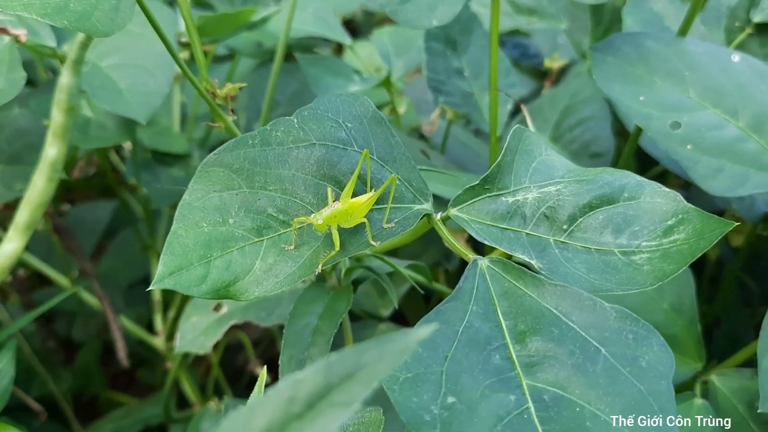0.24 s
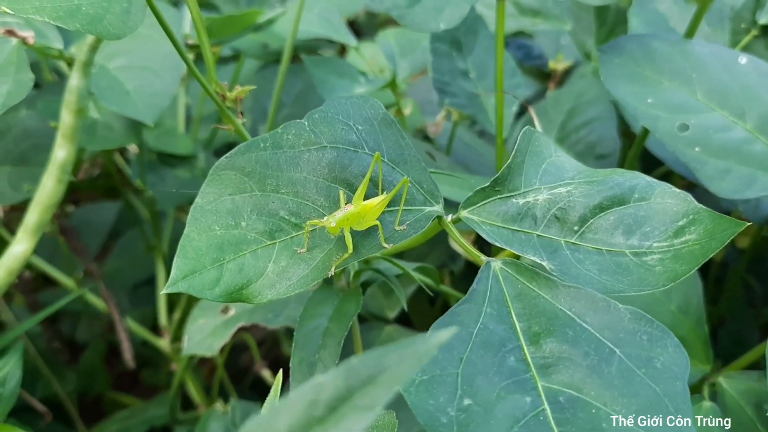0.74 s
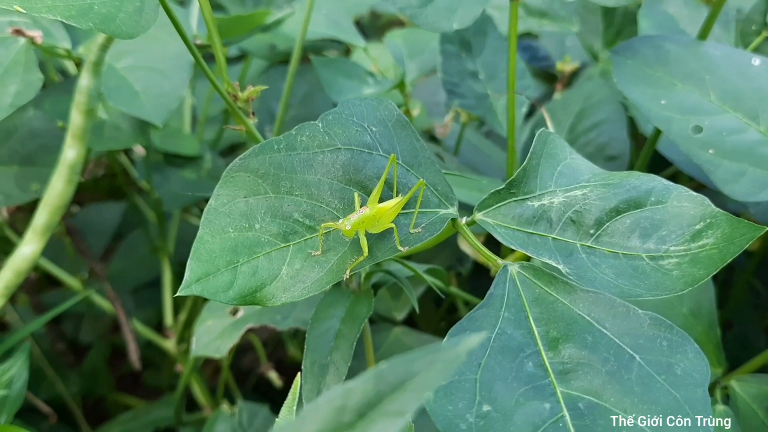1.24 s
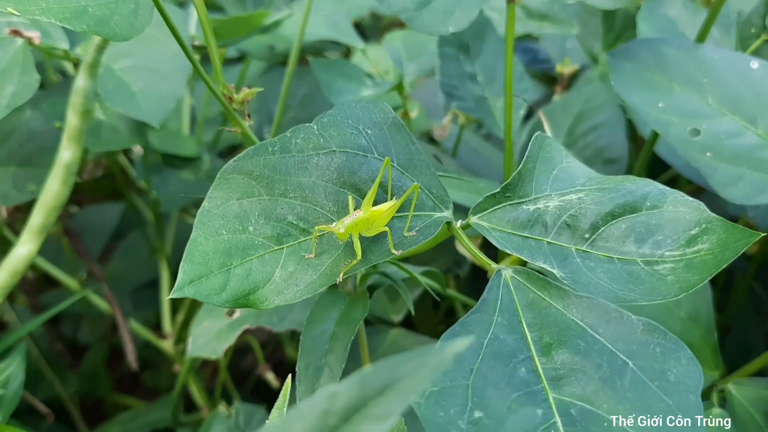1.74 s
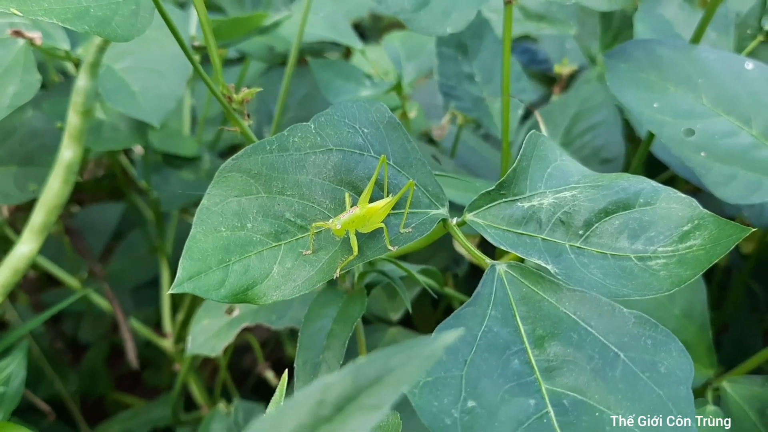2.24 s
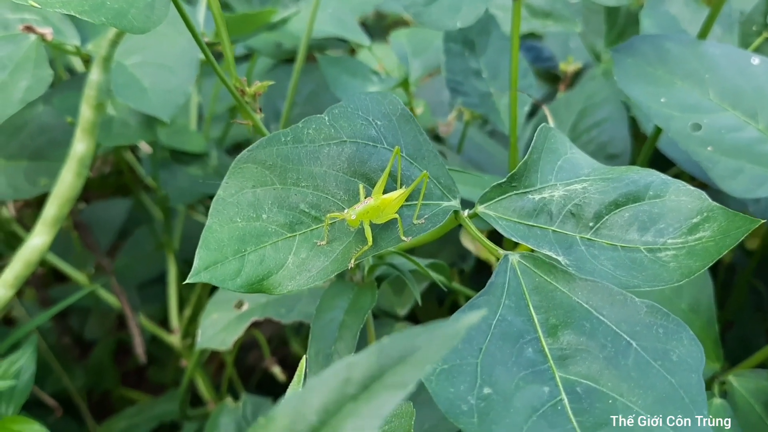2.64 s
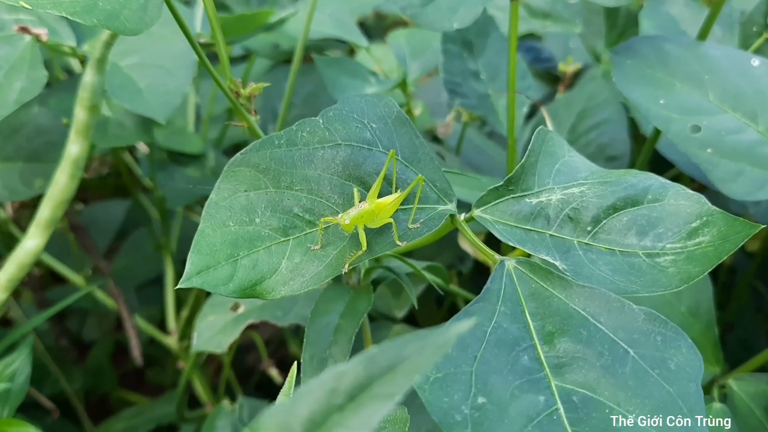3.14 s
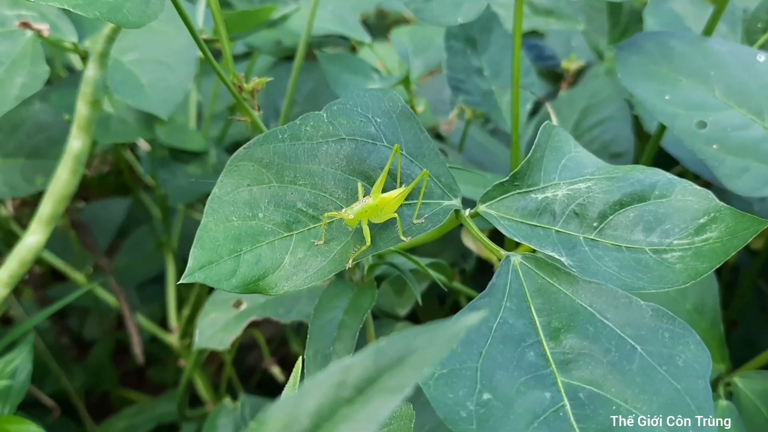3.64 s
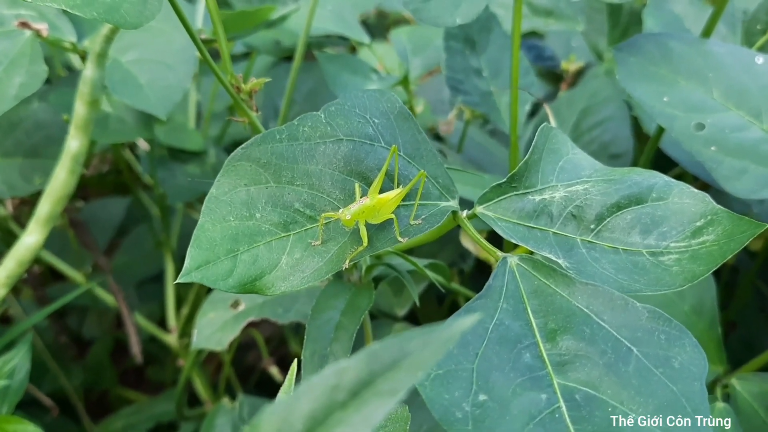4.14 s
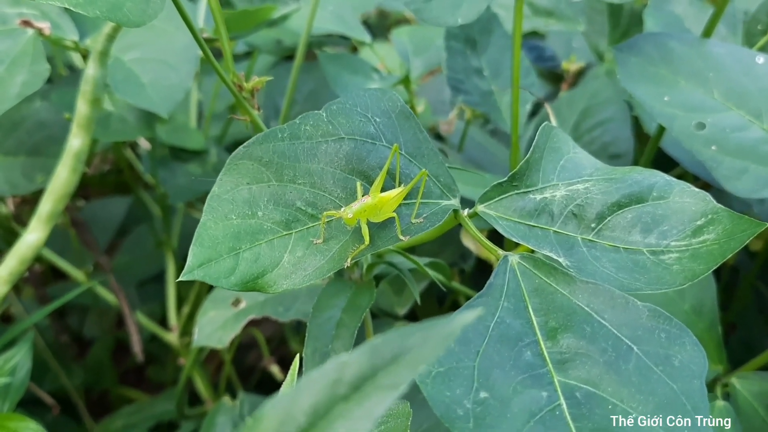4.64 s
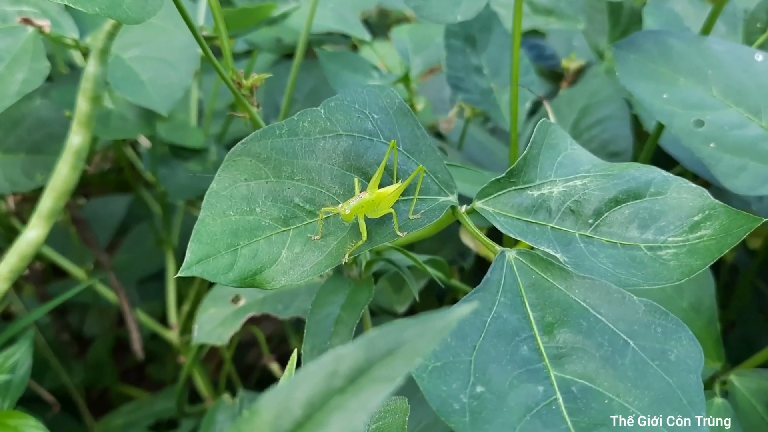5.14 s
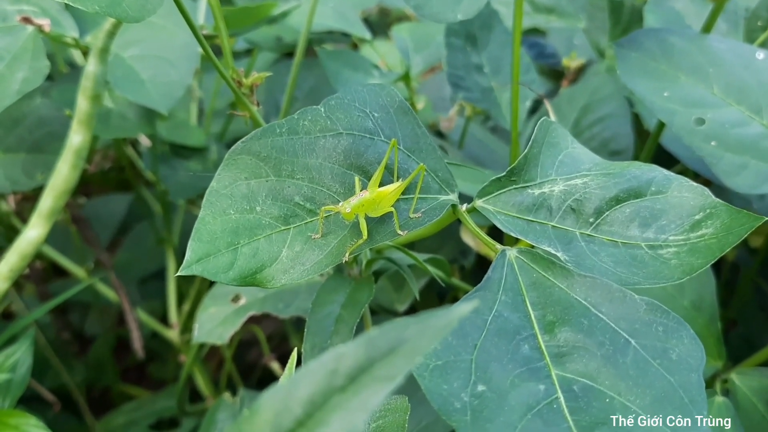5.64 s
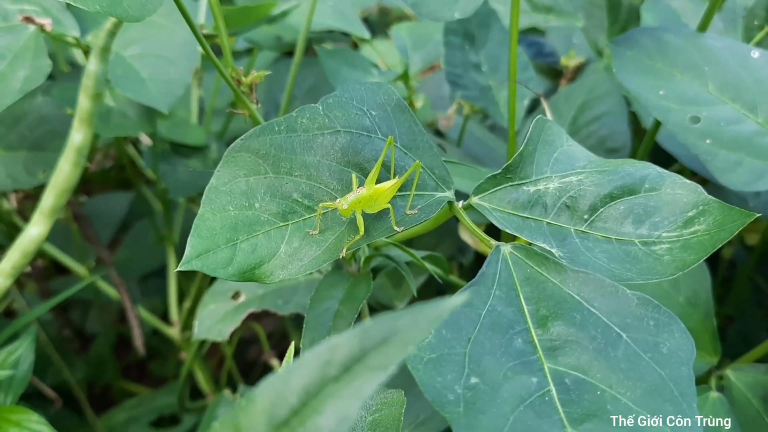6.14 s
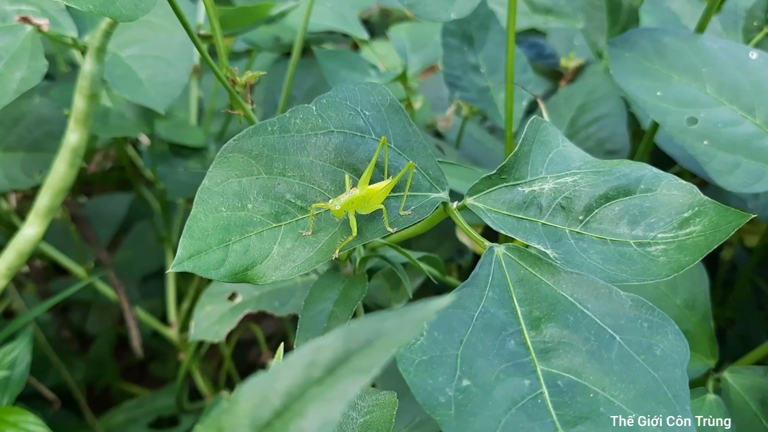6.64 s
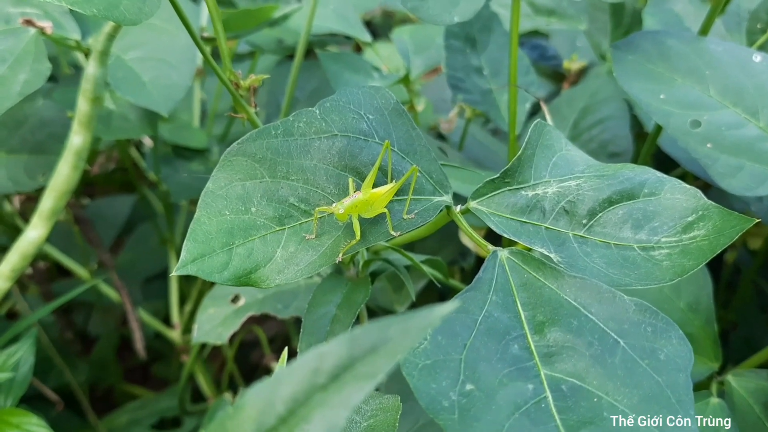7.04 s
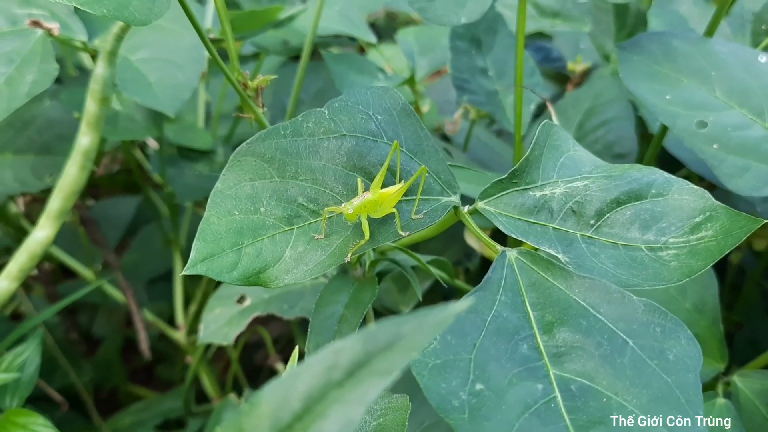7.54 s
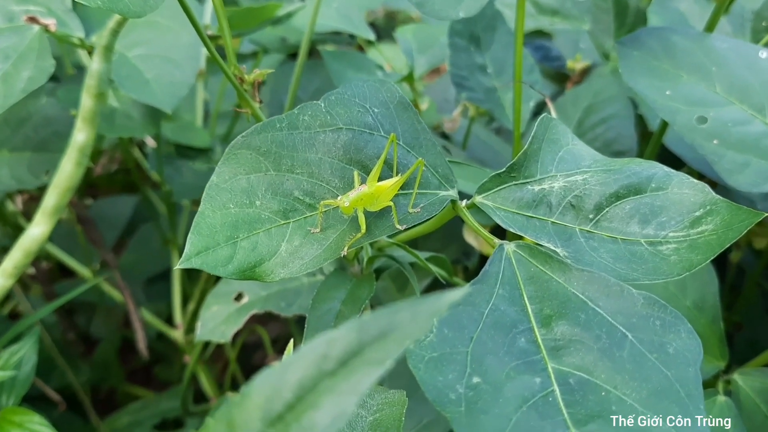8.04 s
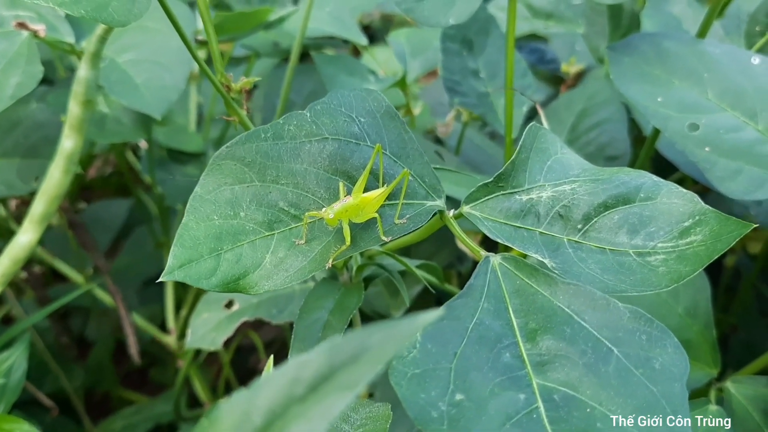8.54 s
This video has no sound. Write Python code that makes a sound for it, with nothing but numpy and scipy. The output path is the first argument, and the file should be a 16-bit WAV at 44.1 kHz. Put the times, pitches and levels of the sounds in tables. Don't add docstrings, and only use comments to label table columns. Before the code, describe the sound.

A continuous daytime insect chorus in a leafy garden, in wide stereo with a soft bed of rumble and hiss. From the start, three close crickets trill around 7.6 to 8.2 kHz, pulsing roughly 26 to 28 times a second. The loudest, on the right, pauses at 0.7-1.1 and 5.0-5.4 seconds and stops near 7.0; another also breaks off and ends about 7.2, while the softest continues throughout. Distant crickets blur behind. Raspy single chirps scatter from 0.1 to 7.0. On the left, katydids sizzle above 9 kHz, stronger after 5.7. Slight leaf rustles and dry snaps come near 0.9, 2.2, 4.7, 5.9, 7.5 and 8.2. A low distant motor hum, faint initially, grows around 1.5, swells at 4-6.4, then eases unsteadily. A very faint falling bird whistle passes at 7.7-8.0.

```python
import sys
import numpy as np
from scipy import signal
from scipy.fft import rfft, irfft, next_fast_len
from scipy.io import wavfile
from scipy.ndimage import uniform_filter1d

SR = 44100
rng = np.random.default_rng(int(sys.argv[2]) if len(sys.argv) > 2 else 0)


def volts_from_decibels(level):
    exponent = np.asarray(level, float) / 20
    return 10 ** exponent


def unload_wav(signal):
    wavfile.write(
        sys.argv[1],
        SR,
        np.round(np.clip(np.atleast_2d(signal).T, -1, 1) * 32767).astype(np.int16),
    )


N = 387462

# first stroke in seconds, last stroke in seconds,
# intervals between strokes (count), warm-up from below in Hz.
TRILL_PHRASES = [
    [(.030, .713, 18, 0), (1.091, 5.029, 104, 250), (5.450, 7.041, 42, 60)],
    [(.028, .756, 21, 0), (1.175, 4.462, 95, 420), (4.817, 5.577, 22, 420), (5.645, 5.680, 1, 0),
     (5.750, 7.197, 42, 0)],
    [(.022, 8.777, 241, 0)],
]
PHRASE_LEVELS = [
    [(-40, -41), (-41.5, -41.5, -39.5, -40.5), (-39.5, -39.5)],
    [(-46, -46.5), (-47, -45.5), (-45.5, -45.5), (-46, -46.5), (-44.5, -44.5)],
    [(-50.5, -52.5, -55, -52.5, -50.5, -50, -53, -53)],
]
STROKE_PITCHES = [7718, 8150, 7585]
# pitch fall in a stroke in Hz, stroke length in ms, # left-ear
# delay in ms (a late echo for the first), scatter by leaves in dB, left-right difference in dB.
WING_TRAITS = [(71, 14.5, 7.0, -12, -19), (80, 16, 0.65, -18, -4), (75.6, 17, -1.5, -9, -3.5)]
WAVER_SPREADS = [0.5, .6, 1.1]
# frequency in Hz, density in dB per Hz.
CHORUS_SPECTRUM = [(6700, -36), (6900, -20.5), (7100, -7.5), (7330, -1), (7600, -0.5), (7900, 0),
                   (8150, -6.5), (8300, -9), (8600, -17.5), (9000, -31)]
# pitch in Hz, strokes per second, level in dB, left-right in dB.
CHORUS_SOLOISTS = [(7403, 26.9, -12.5, -14.5), (7770, 27.8, -11.5, -16), (7895, 28.1, -11, -9)]
# time in seconds, level in dB.
CHORUS_LEVEL = [
    (0, -50),
    (1, -52),
    (2.6, -51),
    (4.4, -50.5),
    (6, -50),
    (8, -52),
    (8.79, -55),
]
# time in seconds, peak in dB, left-right difference in dB.
CHIRP_EVENTS = [(0.1401, -47, -7.0), (0.5566, -50, 2.5), (0.6235, -50, 3.5), (0.8594, -58, -4.0),
                (1.4945, -54, -11.0), (1.9784, -49, -7.5), (3.1208, -54, -6), (3.2455, -52, -7.0),
                (3.3538, -45, -11.5), (3.6676, -50, -6.5), (4.1875, -48, -11), (4.4494, -45, -9.5),
                (4.5466, -50, 4.5), (4.9756, -51, -11.0), (5.0727, -53, -10.5), (5.1635, -47, -8),
                (5.2954, -50, 6.0), (5.5344, -48, -6), (5.8386, -47, -12.5), (6.0465, -51, -7.5),
                (6.1644, -57, -6.0), (6.2572, -52, -7.5), (6.4602, -52, -12.5), (6.5864, -52, -7.5),
                (6.765, -51, -11), (7.005, -49, -11)]
# time in seconds,
# sub-strokes so far (count).
SUBSTROKE_COUNTS = [
    [(0, -.06), (1.25, 106.25), (4, 339.71), (5, 424.59), (8.79, 745.5)],
    [(0, -12.2), (6.5, 554.86), (7, 599.13), (8.79, 754.7)],
]
# time in seconds, level of both in dB, share of the second (0 to 1).
KATYDID_LEVELS = [(0, -50.5, 0.3), (1.5, -51.5, 0.07), (3, -51, 0.1), (5.4, -50.5, 0.01), (5.7, -48, .4),
                  (6.4, -48, 0.64), (7, -47, 0.9), (8.79, -46.5, 0.85)]
# frequency in Hz, density in dB per Hz.
KATYDID_SPECTRUM = [(9000, -13.5), (9800, -20), (10800, -11), (12000, -6), (13100, -3), (14000, -3),
                    (15100, -1), (15750, -5.5), (15900, -53)]
# time in seconds, peak in dB, length in seconds, low edge in Hz, high edge in Hz.
RUSTLE_EVENTS = [(0.198, -64.5, .14, 2000, 5030), (0.551, -62, 0.063, 2000, 6000),
                 (0.849, -63, 0.32, 400, 1400), (0.868, -54, 0.037, 600, 6000),
                 (0.912, -56, .11, 700, 6560), (1.389, -70.5, 0.25, 574, 660),
                 (1.932, -63, 0.065, 2200, 6000), (2.207, -52, .035, 4000, 13000),
                 (4.687, -58, 0.031, 2004, 12000), (5.582, -65, 0.046, 2500, 6000),
                 (5.88, -56, .02, 3000, 13000), (5.958, -57.5, 0.08, 2500, 6500),
                 (6.098, -69, .15, 3230, 4180), (6.903, -65, 0.054, 2000, 6000),
                 (7.5, -62, 0.014, 4504, 6995), (8.212, -53, 0.04, 3504, 13000),
                 (8.27, -63, 0.04, 2510, 4000)]
# time in seconds, peak in dB.
SNAP_EVENTS = [
    (.855, -50),
    (.876, -53),
    (2.196, -43),
    (4.68, -49),
    (5.879, -43),
    (7.503, -49),
    (8.199, -43),
]
# start in seconds, length in seconds, from Hz, to Hz, level in dB.
BIRD_WHISTLE = (7.68, .3, 4100, 3200, -69)
# time in seconds, level in dB.
MOTOR_LOAD = [(0, -69.5), (.5, -72.5), (1.33, -70), (1.45, -63), (2.1, -60.5), (3.05, -63), (4, -57),
              (4.2, -53), (4.85, -51.5), (5, -55), (5.5, -52), (6.4, -51.5), (7.05, -58), (7.5, -54.5),
              (7.7, -57.5), (7.9, -56.5), (8.79, -57)]
# centre in Hz, width in Hz, level in dB.
FAR_DRONES = [(298.2, 18, -70.5), (396, 7, -98.5), (4680, 460, -68)]
# frequency in Hz, density in dB per Hz.
AIR_SPECTRUM = [(12, -28), (40, -9.5), (65, -3), (160, 0.5), (290, -2.5), (430, -14.5), (700, -19.5),
                (1100, -24.5), (1600, -25.5), (3500, -23), (5200, -19.5), (6500, -16.5), (8600, -16),
                (9500, -26), (16000, -36)]
# frequency in Hz, left-right difference in dB.
AIR_BALANCE = [(60, 3.0), (180, -0.5), (550, 6), (1650, 4.5), (4970, -9.5), (15000, 9)]
# frequency in Hz, likeness (0 to 1).
EAR_LIKENESS = [(60, .6), (200, .65), (350, .55), (640, .2), (1400, .3), (4000, .4), (9000, .3),
                (15000, .25)]


def rms_one(x):
    return x / np.sqrt(np.mean(x ** 2) + 1e-20)


def in_time(rows):
    s, *columns = np.transpose(rows)
    return [np.interp(np.arange(N) / SR, s, c) for c in columns]


def at_hz(points, hz):
    table_hz, values = np.transpose(points)
    return np.interp(np.log(hz), np.log(table_hz), values)


def panned(x, pan_db):
    return np.array([x * volts_from_decibels(pan_db / 2), x * volts_from_decibels(-pan_db / 2)])


def drift(rate):
    r = np.exp(-80 * np.pi * rate / SR)
    slow = signal.lfilter([1], [1, -2 * r, r * r], rng.standard_normal(N // 40 + 2002))[2000:]
    return np.interp(np.arange(N) / 40, np.arange(len(slow)), rms_one(slow))


def coloured(source, spectrum, pan=((10, 0), (20000, 0))):
    port_lag_s = 0.0003973
    size = next_fast_len(N)
    hz = np.maximum(np.arange(size // 2 + 1) * SR / size, 1)
    inside = (hz > spectrum[0][0]) & (hz < spectrum[-1][0])
    ear_signs = np.array([[1], [-1]])
    gain = inside * volts_from_decibels(at_hz(spectrum, hz) + at_hz(pan, hz) / 2 * ear_signs)
    alike = np.clip(at_hz(EAR_LIKENESS, hz), 0, 1)
    mid, side = rfft(source, size) * np.sqrt([1 + alike, 1 - alike])
    left = (mid + side) * np.exp(-2j * np.pi * hz * port_lag_s)
    return rms_one(irfft(gain * np.array([left, mid - side]), size)[:, :N])


def leaf_scatter(x, t60=0.094):
    t = np.arange(int(.2 * SR)) / SR
    echoes = rng.standard_normal((2, len(t))) * volts_from_decibels(-60 * t / t60) * (t > .002)
    echoes = echoes / np.sqrt(np.sum(echoes ** 2, axis=1, keepdims=True))
    return signal.fftconvolve(x[None], echoes, axes=1)[:, :N]


def patchy(x, edges_hz, patch_db, rate):
    total = 0
    for k, edges in enumerate(zip(edges_hz, edges_hz[1:])):
        band = signal.butter(2, edges, "band", fs=SR, output="sos")
        sign = (-1) ** k
        total = total + sign * signal.sosfilt(band, x) * volts_from_decibels(patch_db * drift(rate))
    return rms_one(total)


def trill(times, hz, fall_hz, stroke_ms, gains=1, pitch_spread_hz=8, level_spread_db=1.0, rasp=0.051):
    a, b, c, d = rng.standard_normal((len(times), 4)).T[:, :, None]
    length = stroke_ms / 1000 * (1 + .06 * c)
    steps = np.arange(int(.04 * SR))
    u = np.minimum(steps / SR / length, 1)
    swell = np.abs(np.sin(np.pi * u ** 1.05)) ** 0.7
    pitch = np.reshape(hz, (-1, 1)) + pitch_spread_hz * a + fall_hz * (1 - u) ** 2
    uneven_teeth = uniform_filter1d(rng.standard_normal(u.shape), size=30, axis=1) * np.sqrt(30)
    phase = 2 * np.pi * np.cumsum(pitch, axis=1) / SR + rasp * uneven_teeth + 9 * d
    strokes = 3.06 * volts_from_decibels(level_spread_db * b) * swell * np.sin(phase)
    start_s = np.array(times)[:, None] - .6 * length + .0005 * d
    starts = np.maximum(start_s * SR, 0).astype(int)
    weights = strokes * np.reshape(gains, (-1, 1))
    return np.bincount((starts + steps).ravel(), weights.ravel(), N + SR)[:N]


def near_crickets():
    out = 0
    singers = zip(TRILL_PHRASES, PHRASE_LEVELS, STROKE_PITCHES, WING_TRAITS, WAVER_SPREADS)
    for phrases, levels, hz, (fall_hz, ms, lag_ms, wet_db, pan_db), waver_db in singers:
        times, cold_hz, effort_db = [], [], []
        for (first, last, count, low_hz), ends in zip(phrases, levels):
            n = int(count) + 1
            times.append(np.linspace(first, last, n))
            cold_hz.append(low_hz * np.exp(-np.arange(n) / 1.8))
            effort_db.append(np.interp(np.linspace(0, len(ends) - 1, n), np.arange(len(ends)), ends))
        times, cold_hz, effort_db = [np.concatenate(v) for v in (times, cold_hz, effort_db)]
        song = trill(times, hz - cold_hz, fall_hz, ms, volts_from_decibels(effort_db - 0.028 * cold_hz))
        song = song * volts_from_decibels(waver_db * drift(1.6))
        left = np.roll(song, round(lag_ms * SR / 1000)) * volts_from_decibels(pan_db)
        out = out + np.array([left, song]) + volts_from_decibels(wet_db) * leaf_scatter(song)
    return out


def far_chorus():
    level_db, = in_time(CHORUS_LEVEL)
    chorus = coloured(rng.standard_normal((2, N)), CHORUS_SPECTRUM)
    for hz, per_s, song_db, pan_db in CHORUS_SOLOISTS:
        times = np.arange(rng.random() / per_s, N / SR, 1 / per_s)
        song = trill(times, hz, 50, 16) * volts_from_decibels(song_db + 3.0 * drift(0.3))
        chorus = chorus + panned(song, pan_db) + 0.2 * leaf_scatter(song)
    return volts_from_decibels(level_db) * chorus


def chirps():
    s, peak_db, pan_db = np.transpose(CHIRP_EVENTS)
    ears = []
    for side in (1, -1):
        gains = volts_from_decibels(peak_db - 7.5 + side * pan_db / 2)
        ears.append(trill(s + 0.016, 6950, 273, 28, gains, pitch_spread_hz=42, rasp=0.96))
    return signal.sosfilt(signal.butter(2, [6800, 7400], "band", fs=SR, output="sos"), ears)


def katydids(depth=0.22, weak_db=-8, pan_db=9):
    level_db, share = in_time(KATYDID_LEVELS)
    power = 0.2
    for strokes, part in zip(SUBSTROKE_COUNTS, (1 - share, share)):
        count, = in_time(strokes)
        weak = np.round(count) % 4 == 3
        accent = volts_from_decibels(uniform_filter1d(weak_db * weak, size=150))
        power = power + part * ((1 + depth * np.cos(2 * np.pi * count)) * accent) ** 2
    teeth = rng.standard_normal((2, N)) * volts_from_decibels(1.4 * rng.standard_normal((2, N))) * volts_from_decibels(1.07 * drift(300))
    buzz = coloured(teeth * np.sqrt(power), KATYDID_SPECTRUM)
    buzz = patchy(buzz, np.linspace(8600, 16300, 9), patch_db=1.94, rate=30)
    return panned(1, pan_db)[:, None] * volts_from_decibels(level_db - 3.0) * buzz


def rustles():
    out, t = np.zeros((2, N)), np.arange(N) / SR
    for s, peak_db, length, low_hz, high_hz in RUSTLE_EVENTS:
        near = np.abs(t - s) < 3 * length
        envelope = np.exp(-((t[near] - s) / length * 2) ** 2)
        grains = rng.standard_normal((2, near.sum())) * envelope
        band = signal.butter(2, [low_hz, high_hz], "band", fs=SR, output="sos")
        restore = np.sqrt(SR / 2 / (high_hz - low_hz))
        out[:, near] += signal.sosfilt(band, grains) * restore * volts_from_decibels(peak_db - 0.5)
    return out * volts_from_decibels(2.5 * drift(150))


def snaps():
    t60_s, low_hz = .01, 2500
    out, t = np.zeros((2, N)), np.arange(int(.02 * SR)) / SR
    for s, peak_db in SNAP_EVENTS:
        i = int(s * SR)
        out[:, i:i + len(t)] += rng.standard_normal((2, len(t))) * volts_from_decibels(peak_db - 60 * t / t60_s)
    return signal.sosfilt(signal.butter(1, low_hz, "high", fs=SR, output="sos"), out)


def bird():
    s, length, from_hz, to_hz, level_db = BIRD_WHISTLE
    u = np.clip((np.arange(N) / SR - s) / length, 0, 1)
    hz = from_hz + (to_hz - from_hz) * u + 130 * drift(90)
    tone = np.sin(2 * np.pi * np.cumsum(hz) / SR)
    return tone * np.sin(np.pi * u) * volts_from_decibels(level_db + 3 * drift(40))


def motor_hum():
    load_db, = in_time(MOTOR_LOAD)
    hz = 216.0 + .6 * drift(6.7)
    tone = np.sqrt(2) * np.sin(2 * np.pi * np.cumsum(hz) / SR)
    return panned(tone * volts_from_decibels(load_db + 0.98 * drift(6.0)), 4.4)


def far_drones():
    out = 0
    for centre_hz, width_hz, level_db in FAR_DRONES:
        r = np.exp(-np.pi * width_hz / SR)
        ring = [1, -2 * r * np.cos(2 * np.pi * centre_hz / SR), r * r]
        noise = rng.standard_normal(N) + 1.1 * rng.standard_normal((2, N))
        once = signal.lfilter([1, 0, -1], ring, noise)
        twice = signal.lfilter([1, 0, -1], ring, once)
        out = out + rms_one(twice) * volts_from_decibels(level_db + 2.0 * drift(2.9))
    return out


def rumble_and_hiss():
    load_db, = in_time(MOTOR_LOAD)
    air = coloured(rng.standard_normal((2, N)), AIR_SPECTRUM, AIR_BALANCE) * volts_from_decibels(1.07 * drift(15.6))
    low = signal.sosfilt(signal.butter(2, 450, fs=SR, output="sos"), air)
    swell = volts_from_decibels(0.33 * (load_db + 61.5))
    return volts_from_decibels(-56.5) * (air + (swell - 1) * low)


def scene():
    insects = near_crickets() + far_chorus() + chirps() + katydids()
    garden = rustles() + snaps() + bird()
    return insects + garden + motor_hum() + far_drones() + rumble_and_hiss()


def roll_off(x):
    return signal.sosfilt(signal.butter(12, 15830, fs=SR, output="sos"), x)


def record(dry):
    return roll_off(dry)


dry = scene()
out = record(dry)
unload_wav(out)
```